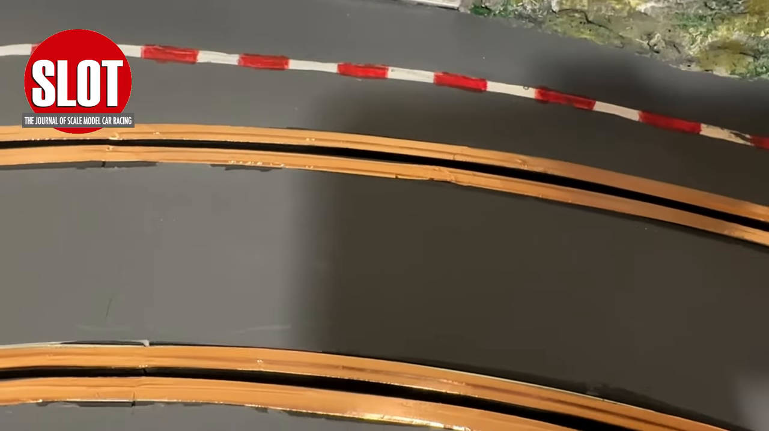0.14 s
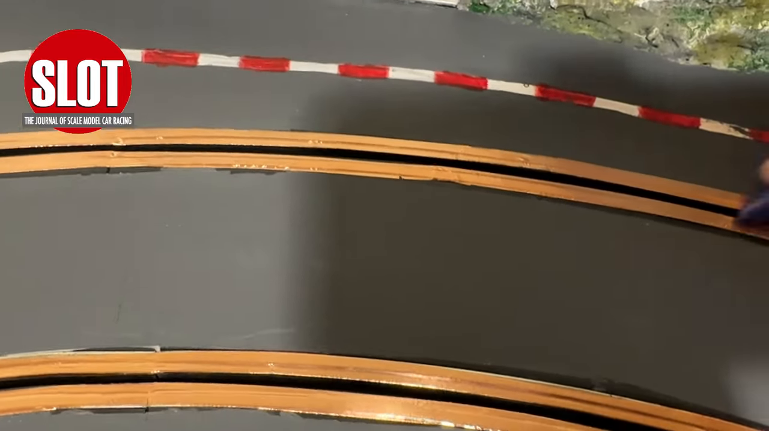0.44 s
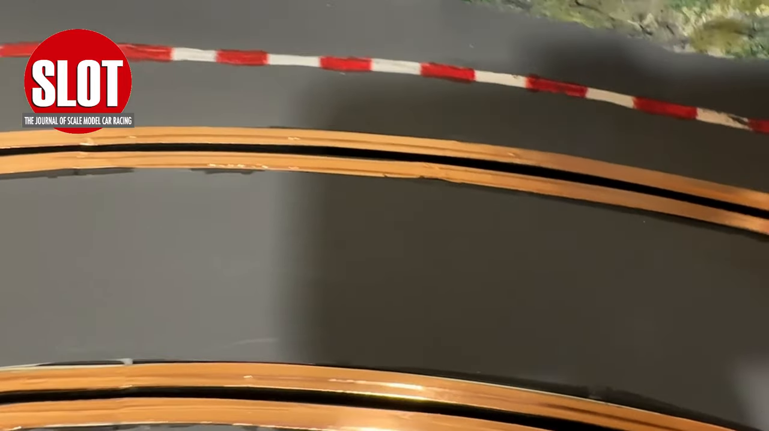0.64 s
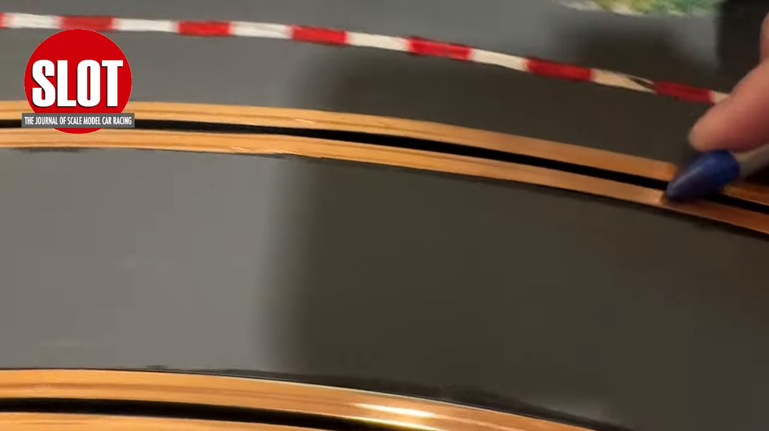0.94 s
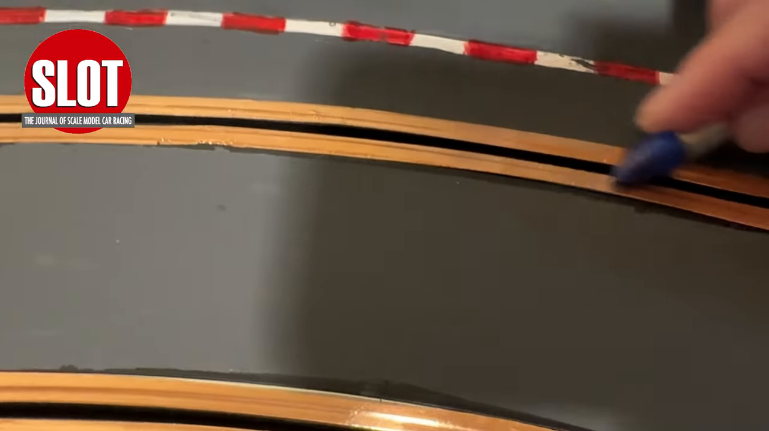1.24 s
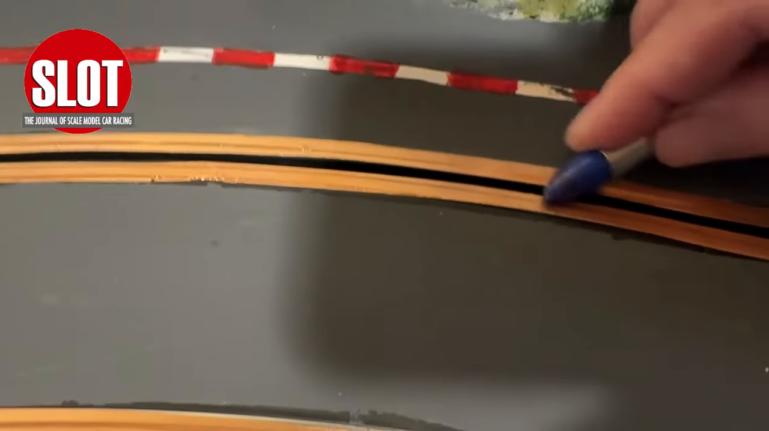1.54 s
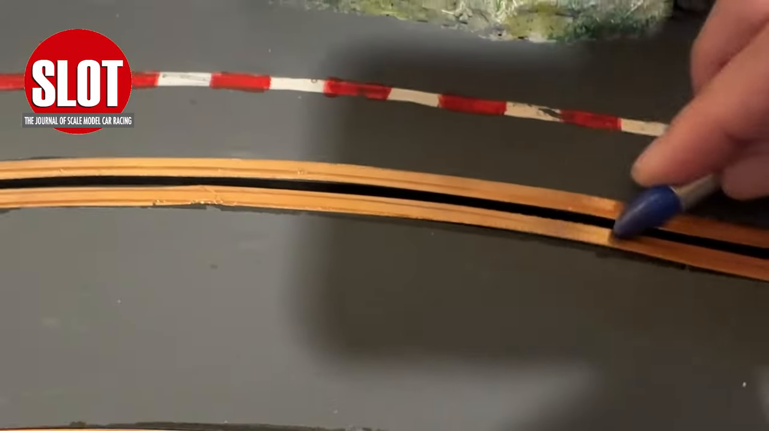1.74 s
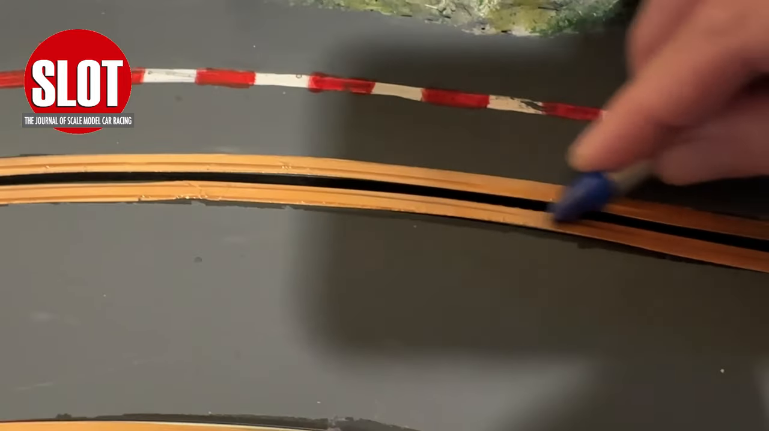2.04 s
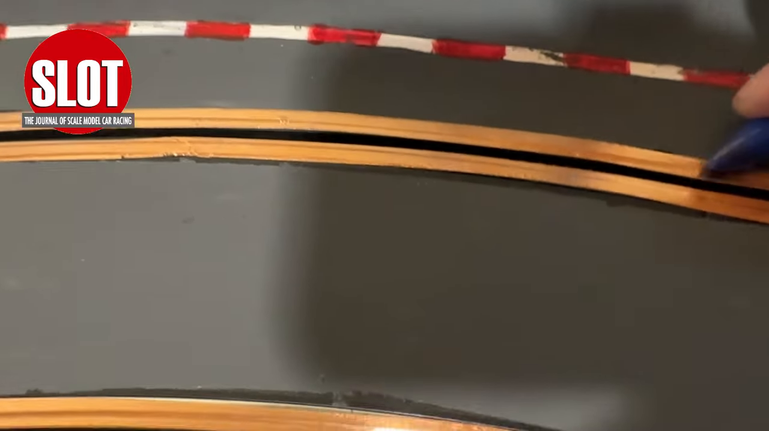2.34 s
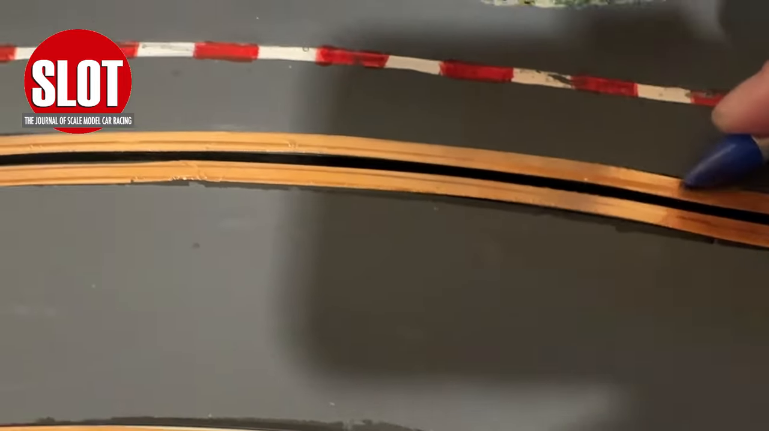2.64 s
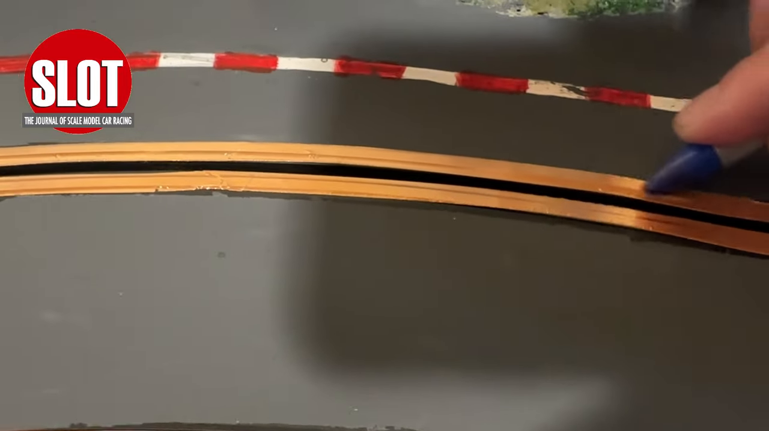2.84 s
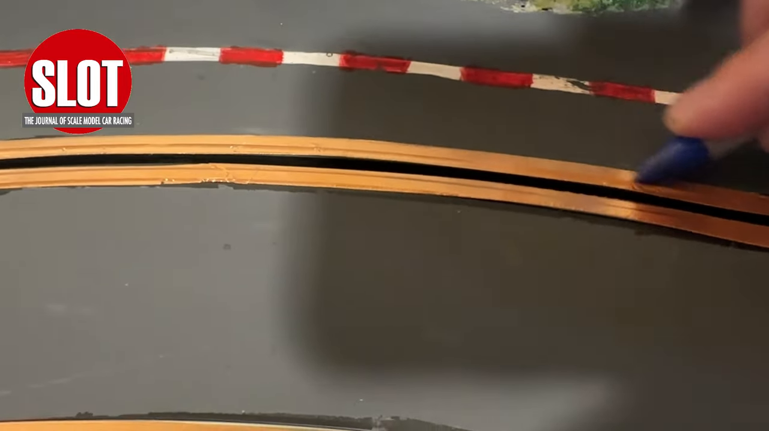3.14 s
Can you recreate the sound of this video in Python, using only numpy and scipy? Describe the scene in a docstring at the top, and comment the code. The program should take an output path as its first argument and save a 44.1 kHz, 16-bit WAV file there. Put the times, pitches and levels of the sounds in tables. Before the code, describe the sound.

Pen rubbing on metal tape over hollow plastic track, hissy scrapes with small knocks and low rumble

```python
"""A smooth pen is rubbed to and fro along metal tape stuck on a plastic toy track, close to a two-port microphone.
Friction noise, strong in mid-stroke, hisses at the tip, scrapes through the board's modes and rumbles in the table.
The tip also knocks on seams: decaying board modes and a wave front, treble first, as bending waves travel.
A tiny high click, a short tone burst, comes before a landing of the tip; a quiet room of coloured noise lies below.
"""
import sys
import numpy as np
from scipy import signal
from scipy.fft import rfft, irfft
from scipy.io import wavfile
from scipy.ndimage import uniform_filter1d

SR = 44100
rng = np.random.default_rng(int(sys.argv[2]) if len(sys.argv) > 2 else 0)


def convert_level_to_amplitude(level_db):
    """Map a level in decibels to its linear amplitude factor."""
    exponent = np.asarray(level_db, float) / 20
    return 10 ** exponent


def generate_wav(sig):
    """Save sig (samples, or channels by samples) to the path in sys.argv[1] as 16-bit PCM at SR."""
    pcm = np.round(np.clip(np.atleast_2d(sig).T, -1, 1) * 32767).astype(np.int16)
    wavfile.write(sys.argv[1], SR, pcm)


N = 145530  # samples

# Room noise spectrum: f/Hz, relative level/dB
ROOM_SPECTRUM = [(19, -36), (32, 5.5), (105, -6), (836, -25), (1140, -32), (1640, -19), (1770, -27.5),
                 (3390, -35.5), (7750, -37), (15600, -45)]
ROOM_DB = -70

# Tip on a seam: t/s, force level/dB, thump level/dB, body level/dB,
# hardness/dB (negative: the treble limit falls by this ratio; positive: treble gain per octave above 1 kHz)
KNOCKS = [(0.1317, -40, -10, 3.5, -13), (.190, -41.5, -15, -4, -4), (0.277, -31.5, -35, 6, -5.5),
          (.377, -48, -11, -7, -11), (0.4647, -39.5, -3, 4.5, -8), (0.9824, -48.5, -15, 10, 4),
          (.993, -30.5, -28, -6.5, -21.5), (1.001, -38.5, -24, 4, -15.5), (1.0523, -49, -4, 5, 5),
          (2.152, -49.5, 13, 12, -4), (2.2906, -34.5, -3.5, -0.5, -10), (2.304, -42.5, -9, -0.5, 0.5),
          (2.3853, -35.5, 1.5, 0, -0.3), (2.658, -54.5, -22, 4, -13.5), (2.925, -42.5, 17, 5.5, -12.5),
          (3.065, -50, 14.5, 8, -17.5)]
# Modes of the board: f/Hz, level/dB, t60/s
BOARD_MODES = [(49.17, -14, 0.28), (96.5, 5, 0.075), (131.3, -1, 0.082), (244, -11.5, 0.1),
               (370, -8, 0.066), (696, -7.5, 0.027), (812, -4, 0.024), (1014, -7, 0.016),
               (1567, -9.5, 0.021), (2300, -46, 0.0076)]

# Strokes of the hand: t/s of the fastest moment, speed-up/s, slow-down/s, speed level/dB, pressure level/dB
STROKES = [(0.191, 0.077, 0.16, -65.5, 12.5), (0.273, 0.03, 0.11, -59.5, 8),
           (0.405, 0.13, 0.16, -60.5, 5.5), (0.602, 0.11, 0.1, -67, 10.5), (0.785, 0.11, 0.11, -68, 8.5),
           (0.932, 0.066, 0.21, -66.5, 7.5), (0.989, 0.011, 0.034, -56, 12),
           (1.101, 0.24, 0.093, -70, 12.5), (1.256, 0.078, 0.12, -68, 6.5), (1.419, 0.093, 0.17, -70, 11),
           (1.616, 0.086, 0.14, -67.5, 8.5), (1.819, 0.081, 0.067, -77.5, 15.5),
           (1.896, 0.072, 0.079, -70, 8.5), (2.049, 0.1, 0.14, -63, 5.5), (2.197, 0.13, 0.036, -69.5, 14),
           (2.326, 0.042, 0.049, -61.5, 10), (2.429, 0.09, 0.088, -64.5, 5.5),
           (2.527, 0.069, 0.023, -74, 11), (2.679, 0.061, 0.14, -77.5, 17), (2.8, 0.21, 0.63, -80, 7),
           (2.938, 0.067, 0.093, -60.5, 17.5), (3.084, 0.032, 0.24, -65, 11.5),
           (3.168, 0.13, 0.048, -64.5, 2)]
# Weight of the moving hand on the board: t/s, level/dB
HAND_LOAD = [(0, -59), (.12, -86), (.15, -47), (.3, -51), (.4, -58), (.48, -52), (.85, -51), (1.3, -49.5),
             (1.66, -49.5), (1.76, -65), (1.83, -49.5), (1.96, -58.5), (2.04, -47), (2.16, -45.5),
             (2.27, -60), (2.31, -47), (2.42, -47), (2.53, -48), (2.62, -81.5), (2.69, -48.5), (2.78, -68),
             (2.85, -75), (2.93, -40.5), (3.0, -35.5), (3.05, -49), (3.1, -41.5), (3.19, -49), (3.24, -59),
             (3.3, -55.5)]
# The hand leans on the table and its deep modes take over:
# t/s, level/dB gained below LEGS_HZ and lost above TABLE_HZ
LEAN = [(1.5, 0), (2.1, -3.5), (2.35, 0.5), (2.85, 1), (3.0, 5), (3.25, 2.5)]
# Tilt of the pen: t/s, ring level/dB, pitch shift of the ring/%
PEN_TILT = [(.3, -1, 2), (.42, -24, -3), (.6, 7.5, -2.5), (.95, -3, 1), (1.26, 0.5, 0.5), (1.6, 5, -0.5),
            (1.85, 10.5, -1), (2.08, 0, 0.5), (2.2, -9, 8), (2.7, -12.5, 8), (3.3, -6, 16)]
# Resonances of the pen barrel and tip: f/Hz, width/Hz, level/dB
PEN_MODES = [(1250, 540, -6.5), (2452, 430, -11), (3830, 790, -24), (9390, 1300, -10.5)]
# Spectra of tip hiss, board scrape and table rumble: f/Hz, relative level/dB per Hz
HISS_SPECTRUM = [(1500, -8), (2300, 0), (3200, 1), (5500, -1), (6900, -5.5), (8500, 3.5), (11500, -3.5),
                 (15600, -6)]
SCRAPE_SPECTRUM = [(140, -8.5), (230, -1), (284, -3.5), (554, -10), (661, -5), (734, -15), (850, -12.5),
                   (954, -17.5), (1040, -12.5), (1290, -17.5), (1920, -20.5), (2500, -43), (2800, -28),
                   (3300, -43)]
RUMBLE_SPECTRUM = [(22, -31), (36, -14.5), (48, 12), (66, -4), (89, 3.5), (110, 3), (128, -3), (150, -1.5),
                   (178, -16), (242, -18.5), (340, -45)]

# Likeness of the two ports, in the bass and above it: f/Hz, likeness (0 to 1)
BASS_LIKENESS = [(30, .985), (120, .97), (250, .94)]
LIKENESS = [(600, 0.51), (1500, 0.51), (4000, 0.5), (8000, 0.86), (11000, 0.82), (15000, 0.31)]
# Phase by which the left port leads: f/Hz, phase/rad
LEFT_LEAD = [(300, 0), (1300, -.4), (3000, .8), (6600, 1), (8000, 2.6), (10500, .3), (15000, 0)]
# Balance, left minus right: f/Hz, level/dB
BALANCE = [(60, 1.5), (380, 0), (1300, 2.5), (4400, 2), (15000, 0)]

FLICK_S, FLICK_DB, FLICK_HZ = .1085, -59.5, 5900

KNOCK_SAMPLES = 9000
THUMP_BELOW_HZ, BODY_BELOW_HZ = 200, 500  # mode groups
SCATTER_DB, DETUNE = 1.5, .012  # level and relative pitch change of the modes from place to place
SPREAD_S, SPREAD_HZ = 0.002067, 446  # bending-wave delay, and the frequency that has it
FRONT_DB, FRONT_LOW_HZ, ECHO_S = 2.5, 240, 0.0023  # first wave front and its scattered copies
DULL_HZ, TICK_DB = 8800, -26  # treble limit unless the blow is soft; faint treble edge left in every blow

GRIT_PER_S, GRIT_DB, GRIT_SHARE = 3000, 2.5, .25  # bumps of the tape under the tip
JUDDER_DB = 1.8  # rms
PLACE_DB, PLACE_BINS, PLACE_FRAMES = 3, 3, 30  # colour drifts as the tip moves over the board
HISS_ROUNDNESS, SCRAPE_ROUNDNESS = 3, 2.58  # powers of the cosine arch of a stroke
RASP_HZ, RASP_WIDTH_HZ, RASP_DB = 7200, 1800, -14.5  # level while the ring stands at 0 dB
SHAKE_DB = -5.5  # rumble that follows the scrape itself
TABLE_HZ, LEGS_HZ = 110.3, 63.4

LOW_CUT_HZ = 32


def evened(x):
    """Normalisation of mean power: scales to rms 1."""
    return x / np.sqrt(np.mean(x ** 2) + 1e-20)


def read(points, hz):
    """Interpolation on a logarithmic frequency axis."""
    f, value = np.transpose(points)
    return np.interp(np.log(hz + 1), np.log(f + 1), value)


def curve(points):
    """Linear interpolation in time: the table value at every sample."""
    return np.interp(np.arange(N) / SR, *np.transpose(points))


def coloured(x, points):
    """Spectral shaping: weights x by the table, silent outside its range, rms 1."""
    hz = np.fft.rfftfreq(N, 1 / SR)
    inside = (hz > points[0][0]) & (hz < points[-1][0])
    return evened(irfft(rfft(x) * convert_level_to_amplitude(read(points, hz)) * inside, N))


def room():
    """Stationary background noise: coloured Gaussian noise, independent in the two paths."""
    return convert_level_to_amplitude(ROOM_DB) * coloured(rng.standard_normal((2, N)), ROOM_SPECTRUM)


def flick():
    """Tone burst: a few fast cycles under a Gaussian envelope."""
    t = np.arange(N) / SR - FLICK_S
    return convert_level_to_amplitude(FLICK_DB) * np.exp(-(t / 0.00029) ** 2) * np.sin(2 * np.pi * FLICK_HZ * t)


def board_ring(t, thump_db, body_db):
    """Modal decay: damped sines, the low ones arriving later as bending waves do."""
    hz, db, t60 = np.transpose(BOARD_MODES)[:, :, None]
    level_chance, pitch_chance = np.split(rng.standard_normal((2, len(BOARD_MODES), 2)), 2, axis=2)
    late = np.maximum(t - SPREAD_S * np.sqrt(SPREAD_HZ / hz), 0)  # time since arrival
    group_db = np.where(hz < THUMP_BELOW_HZ, thump_db, body_db * (hz < BODY_BELOW_HZ))
    level = convert_level_to_amplitude(db + group_db + SCATTER_DB * np.tanh(level_chance))
    envelope = np.minimum(late * hz, 1) * convert_level_to_amplitude(-60 * late / t60)  # rises over one period
    pitch = hz * (1 + DETUNE * pitch_chance)
    return (level * envelope * np.sin(2 * np.pi * pitch * late)).sum(1)


def wave_front(t, f):
    """Bending-wave dispersion: delay goes as 1/sqrt(f), so the front sweeps down in pitch (a spectrum)."""
    copies = (t == 0) + 0.29 * rng.standard_normal((2, len(t))) * np.exp(-t / ECHO_S)
    delay = np.exp(-4j * np.pi * SPREAD_S * np.sqrt(SPREAD_HZ * f))
    colour = f ** 2 / (f ** 2 + FRONT_LOW_HZ ** 2) / (1 + f / 700)
    return convert_level_to_amplitude(FRONT_DB) * 10 * delay * colour * rfft(copies)


def knock(force_db, thump_db, body_db, hard_db):
    """Impact excitation: wave front and modes; soft blows lose their treble, hard ones gain it."""
    t, f = np.arange(KNOCK_SAMPLES) / SR, np.fft.rfftfreq(KNOCK_SAMPLES, 1 / SR)
    both = rfft(board_ring(t, thump_db, body_db)) + wave_front(t, f)
    u = f / (DULL_HZ * convert_level_to_amplitude(min(hard_db, 0)))
    dulling = (1 - u ** 2 + np.sqrt(2) * 1j * u) ** 2
    gain = convert_level_to_amplitude(max(hard_db, 0) * np.log2(np.maximum(f / 1000, 1)))
    return convert_level_to_amplitude(force_db) * irfft(both * (gain / dulling + convert_level_to_amplitude(TICK_DB)), len(t))


def motion(roundness, pressed):
    """Power addition of the cosine stroke arches; pressed is the share of the pressure dB applied."""
    t, power = np.arange(N) / SR, np.zeros(N)
    for top, rise, fall, speed_db, press_db in STROKES:
        u = np.clip((t - top) / np.where(t < top, rise, fall), -1, 1)
        arch = np.abs(np.cos(np.pi * u / 2)) ** roundness
        power += (convert_level_to_amplitude(speed_db + pressed * press_db) * arch) ** 2
    return np.sqrt(power)


def friction():
    """Random contact force under the tip: fine noise and sparse grit, with a quick judder; two paths."""
    height = convert_level_to_amplitude(GRIT_DB * np.minimum(rng.exponential(1, N), 5))
    grit = height * (rng.random(N) < GRIT_PER_S / SR)
    noise, sign = rng.standard_normal((2, 2, N))
    wander = uniform_filter1d(rng.standard_normal(N), size=300)
    judder = evened(uniform_filter1d(wander, size=300))
    return convert_level_to_amplitude(JUDDER_DB * judder) * ((1 - GRIT_SHARE) * noise + GRIT_SHARE * evened(grit * sign))


def placed(x):
    """Place-dependent transfer: narrow peaks and dips that last about one stroke."""
    z = signal.stft(x, nperseg=512, noverlap=384)[2]
    field = rng.standard_normal(z.shape[:0:-1]).T  # frequency by time, shared by both paths
    field = uniform_filter1d(field, size=PLACE_BINS, axis=0)
    field = uniform_filter1d(field, size=PLACE_FRAMES, axis=1)
    return evened(signal.istft(z * convert_level_to_amplitude(PLACE_DB * evened(field)), nperseg=512, noverlap=384)[1][:, :N])


def band(x, hz, width_hz):
    """Damped resonance that follows the curve hz, rms 1."""
    turn = np.exp(2j * np.pi * np.cumsum(hz * np.ones(N)) / SR)
    r = np.exp(-np.pi * width_hz / SR)
    return evened((turn * signal.lfilter([1], [1, -2 * r, r * r], x / turn)).real)


def tip_sound(force):
    """Radiation at the tip: hiss, pen resonances that vary with tilt, and a rasp that grows as they fade."""
    t, ring_db, shift = np.transpose(PEN_TILT)
    ring_db, shift = curve(np.transpose([t, ring_db])), curve(np.transpose([t, shift]))
    ring = sum(convert_level_to_amplitude(db) * band(force, f * (1 + shift / 100), w) for f, w, db in PEN_MODES)
    rasp = convert_level_to_amplitude(RASP_DB - ring_db / 2) * band(force, RASP_HZ, RASP_WIDTH_HZ)
    return motion(HISS_ROUNDNESS, pressed=0) * (coloured(force, HISS_SPECTRUM) + convert_level_to_amplitude(ring_db) * ring + rasp)


def table_rumble(raw, scrape_level):
    """Structure-borne sound: the force shakes the table, whose deep modes gain as the hand leans."""
    hz = np.fft.rfftfreq(N, 1 / SR)
    rumble = coloured(raw, RUMBLE_SPECTRUM)
    upper = irfft(rfft(rumble) * (hz > TABLE_HZ), N)
    lower = irfft(rfft(rumble) * (hz < LEGS_HZ), N)
    deeper = convert_level_to_amplitude(curve(LEAN))
    weight = np.hypot(convert_level_to_amplitude(curve(HAND_LOAD)), convert_level_to_amplitude(SHAKE_DB) * scrape_level)
    return weight * (rumble + (1 / deeper - 1) * upper + (deeper - 1) * lower)


def rubbing():
    """Common excitation: one friction force heard as tip hiss, pen ring, board scrape and table rumble."""
    raw = friction()
    force = placed(raw)
    scrape_level = motion(SCRAPE_ROUNDNESS, pressed=0.91)
    scrape = scrape_level * coloured(force, SCRAPE_SPECTRUM)
    return tip_sound(force) + scrape + table_rumble(raw, scrape_level)


def scene():
    """Superposition of the sources in two paths, blended later by the microphone ports."""
    mix = room() + flick() + rubbing()
    for s, *how in KNOCKS:
        part = mix[:, round(s * SR):][:, :KNOCK_SAMPLES]
        part += knock(*how)[:, :part.shape[1]]
    return mix


def low_pass(x):
    """Removes everything above the highest recorded frequency."""
    return signal.sosfilt(signal.butter(12, 16390, fs=SR, output="sos"), x)


def record(dry):
    """Partial coherence of two close ports: likeness, phase and balance change with pitch; then a low cut."""
    hz = np.fft.rfftfreq(2 * N, 1 / SR)
    a, b = rfft(np.hstack([dry, dry[:, ::-1]]))  # mirrored so that the ends join smoothly
    same = np.clip(read(BASS_LIKENESS + LIKENESS, hz), 0, 1)
    tilt = convert_level_to_amplitude(read(BALANCE, hz) / 2)  # half to each side
    right = same * a * np.exp(-1j * read(LEFT_LEAD, hz)) + np.sqrt(1 - same ** 2) * b
    low_cut = 1 / np.sqrt(1 + (LOW_CUT_HZ / (hz + 1)) ** 8)
    return low_pass(irfft(np.array([a * tilt, right / tilt]) * low_cut, 2 * N)[:, :N])


dry = scene()
out = record(dry)
generate_wav(out)
```